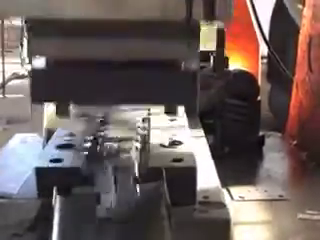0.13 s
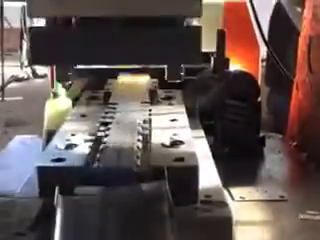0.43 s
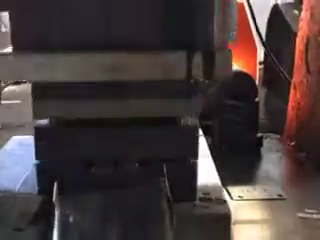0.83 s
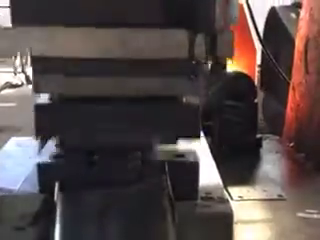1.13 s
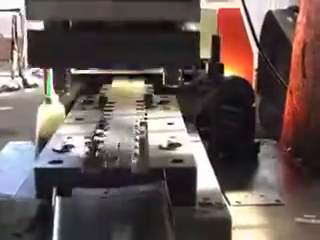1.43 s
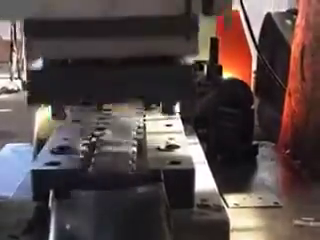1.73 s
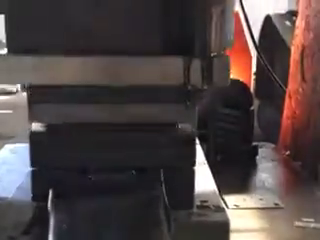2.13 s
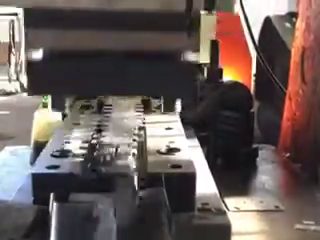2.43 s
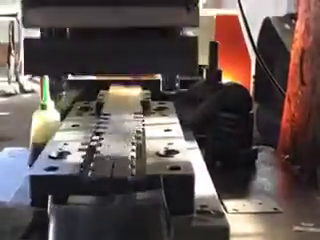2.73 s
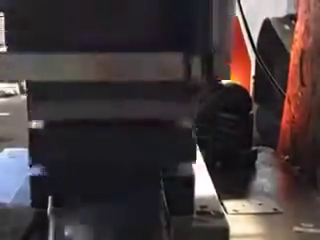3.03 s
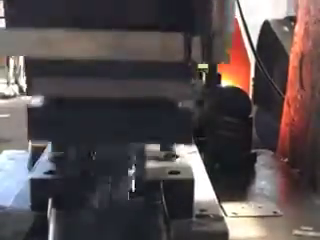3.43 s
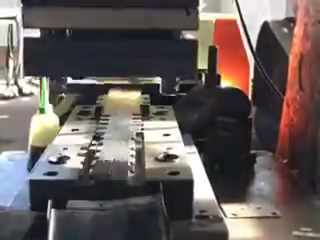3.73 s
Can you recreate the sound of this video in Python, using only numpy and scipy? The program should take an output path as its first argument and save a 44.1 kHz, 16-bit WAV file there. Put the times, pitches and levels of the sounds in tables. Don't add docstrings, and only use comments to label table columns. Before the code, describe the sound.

Stamping press pounds about once a second, steel clanks ringing over a roaring factory hall

```python
import sys
import numpy as np
from scipy import signal
from scipy.fft import rfft, irfft, next_fast_len
from scipy.io import wavfile
from scipy.ndimage import uniform_filter1d

SR = 44100
rng = np.random.default_rng(int(sys.argv[2]) if len(sys.argv) > 2 else 0)


def to_linear_factor(level_db):
    exponent = np.asarray(level_db, float) / 20
    return 10 ** exponent


def dump(signal):
    limited = np.clip(np.atleast_2d(signal).T, -1, 1)
    pcm = np.round(limited * 32767).astype(np.int16)
    wavfile.write(sys.argv[1], SR, pcm)


N = 171990

# start in seconds, peak in dB, pitch in Hz, 60 dB decay in seconds.
CLANKS = [(0.001, -1, 485, 0.62), (0.1, -10.5, 1300, 0.28), (0.442, -13.5, 485, 0.1),
          (0.592, -5, 347, 0.19), (0.639, -10.5, 1220, 0.46), (0.866, -7, 1190, 0.33),
          (0.881, -5.5, 1350, 0.16), (0.94, -4, 434, 0.62), (1.009, -15, 1080, 0.8), (1.1, -11.5, 670, 1),
          (1.207, -16, 600, 0.39), (1.271, -1.5, 622, 0.091), (1.585, -9.5, 780, 0.42),
          (1.719, -6, 347, 0.18), (1.78, -10, 1260, 1), (2, -6, 730, 0.16), (2.058, -6, 356, 0.49),
          (2.139, -8, 1060, 0.58), (2.248, -12.5, 371, 1), (2.329, -5, 483, 0.24), (2.39, -11.5, 371, 0.22),
          (2.745, -9.5, 1190, 0.39), (2.849, -8.5, 600, 0.4), (2.911, -1, 955, 0.28),
          (3.185, -6, 540, 0.48), (3.259, -10.5, 1060, 0.46), (3.398, -9, 605, 0.81),
          (3.469, -2, 458, 0.19)]
# start in seconds, peak in dB, pitch in Hz, 60 dB decay in seconds.
NEIGHBOUR = [
    (0.038, -12, 1060, 0.39),
    (0.328, -14.5, 623, 0.65),
    (0.379, -10.5, 351, 0.21),
    (0.773, -15, 716, 1),
    (1.365, -8, 1160, 0.13),
    (1.919, -13.5, 1200, 0.31),
    (2.982, -4.5, 693, 0.15),
    (3.115, -11.5, 422, 0.79),
    (3.329, -10, 517, 0.47),
    (3.854, -9.5, 810, 0.91),
]


def rms_one(x):
    return x / np.sqrt(np.mean(x ** 2) + 1e-20)


def lowpass(x, hz):
    return signal.sosfilt(signal.butter(2, hz, fs=SR, output="sos"), x)


def shape_spectrum(x, curve):
    hz, db = np.transpose(curve)
    f = np.maximum(np.arange(N // 2 + 1) * SR / N, 1)
    return irfft(rfft(x) * to_linear_factor(np.interp(np.log(f), np.log(hz), db)), N)


def coloured(spectrum):
    return rms_one(shape_spectrum(rng.standard_normal(N), spectrum))


def resonate(x, hz, width_hz):
    r = np.exp(-np.pi * width_hz / SR)
    poles = [1, -2 * r * np.cos(2 * np.pi * hz / SR), r * r]
    return signal.lfilter(np.array([1, 0, -1]) * (1 - r * r) / 2, poles, x + 1e-18)


def drift(rate_hz):
    r = np.exp(-2 * np.pi * rate_hz / SR)
    slow = signal.lfilter([1], [1, -2 * r, r * r], rng.standard_normal(N + SR))[SR:]
    return rms_one(slow - slow.mean())


def blows(table, attack_s, q, broad_db, cut_hz, gain_db):
    # frequency in Hz, density in dB per Hz.
    steel_colour = [(60, -26), (248, -10), (300, -9), (1130, -10), (2210, -17.5), (3820, -21.5),
                    (6730, -28), (7900, -32.5)]
    out = np.zeros(N + SR)
    t = np.arange(SR // 2) / SR
    rattle = to_linear_factor(2.5 * drift(57))
    steel = lowpass(coloured(steel_colour), cut_hz) * rattle
    steel = np.concatenate([steel, steel[:SR]])
    white = rng.standard_normal(N + SR)
    for start_s, db, hz, t60 in table:
        i = max(int(start_s * SR), 0)
        span = slice(i, i + len(t))
        shape = (1 - np.exp(-t / attack_s)) * to_linear_factor(db + gain_db - 60 * t / max(t60, .02))
        tone = rms_one(resonate(resonate(white[span], hz, hz / q), hz, 2 * hz / q))
        out[span] += shape * (tone + to_linear_factor(broad_db) * steel[span])
    return out[:N]


def drone():
    # frequency in Hz, density in dB per Hz.
    roar_colour = [(60, -27), (217, -1), (289, -7.5), (710, -8.5), (2430, -16), (3520, -18.5),
                   (6660, -30.5), (7900, -39)]
    # frequency in Hz, width in Hz, level in dB.
    motor_whines = [(247, 40, -39), (600, 50, -39), (700, 16, -33), (1268, 25, -37), (3530, 150, -43)]
    whines = np.zeros(N)
    for hz, width_hz, db in motor_whines:
        whine = rms_one(resonate(rng.standard_normal(N), hz, width_hz))
        whines += to_linear_factor(db + 1.4 * drift(2.4)) * whine
    flicker = to_linear_factor(-23 + 2.2 * drift(10))
    return flicker * coloured(roar_colour) + whines


def clanks():
    return blows(CLANKS, attack_s=.009, q=4.1, broad_db=5.5, cut_hz=3180, gain_db=-10.0)


def frame():
    # frequency in Hz, level in dB, 60 dB decay in seconds.
    frame_modes = [(240.5, -10, 0.38), (380.7, -1.5, 0.14), (600, -7.5, 0.13), (692, -12.5, 0.48),
                   (1237, 3, 0.089), (1674, -4, 0.11)]
    start_s, db = np.transpose(list(CLANKS) + list(NEIGHBOUR))[:2]
    out = np.zeros(N)
    luck_db = rng.normal(0, 3.9, (len(start_s), len(frame_modes)))
    for k, (hz, mode_db, t60) in enumerate(frame_modes):
        clicks = np.zeros(N)
        clicks[(start_s * SR).astype(int)] = to_linear_factor(db + mode_db - 13 + luck_db[:, k])
        r = to_linear_factor(-60 / (t60 * SR))
        w = 2 * np.pi * hz / SR
        out += signal.lfilter([0, np.sin(w)], [1, -2 * r * np.cos(w), r * r], clicks + 1e-18)
    return out


def thumps():
    # start in seconds, peak in dB, pitch in Hz, 60 dB decay in seconds.
    low_thumps = [(.004, 3, 217, 0.15), (.059, -15, 222, 0.28), (.345, -7.5, 178, 0.56),
                  (.594, -16, 237, 0.17), (.982, 6, 234, 0.16), (1.159, -1.5, 253, 0.36),
                  (1.912, -7.5, 177, 0.43), (2.03, -15.5, 246, 0.27), (2.14, -1, 250, 0.27),
                  (2.249, -8, 207, 0.9), (2.364, -17.5, 230, 0.41), (2.89, -3.5, 172, 0.58),
                  (2.937, 2, 210, 0.13), (3.019, -6, 229, 0.13), (3.129, -13, 226, 0.11),
                  (3.262, -3, 236, 0.34), (3.402, -7.5, 238, 0.43), (3.854, -6.5, 177, 0.35)]
    return blows(low_thumps, attack_s=0.008, q=1.95, broad_db=-14.5, cut_hz=1600, gain_db=-9.5)


def hall(x):
    t60_s, cut_hz = 0.73, 8400
    size = next_fast_len(N + 2 * SR)
    f = np.arange(size // 2 + 1) * SR / size
    response = 0
    for k, lag_s in enumerate(rng.uniform(.02, .06, 12)):
        loss = to_linear_factor(-60 * lag_s / t60_s * (1 + (f / cut_hz) ** 2))
        loop = loss * np.exp(-2j * np.pi * f * lag_s)
        response = response + (-1) ** k * loop / (1 - loop)
    return irfft(rfft(x, size) * response, size)[:N] / 1.84


def ticks():
    # start in seconds, peak in dB, pitch in Hz, 60 dB decay in seconds.
    punch_ticks = [(0.0344, -6.5, 3650, 0.1), (0.0762, -6.5, 2780, 0.2), (0.2924, -11, 2320, 0.35),
                   (0.6438, -16, 2240, 0.2), (0.8555, -15.5, 2310, 0.2), (0.9308, -20, 3420, 0.29),
                   (1.0055, -6, 3380, 0.094), (1.058, -21, 3330, 0.17), (1.207, -6.5, 2790, 0.12),
                   (1.24, -19.5, 3030, 0.13), (1.2675, -13.5, 2680, 0.18), (1.599, -17.5, 2970, 0.23),
                   (1.7704, -14, 2300, 0.42), (1.917, -20, 2010, 0.92), (2.0906, -21, 2235, 0.31),
                   (2.1365, -5, 2850, 0.074), (2.109, -19, 2600, 0.12), (2.286, -17, 2200, .12),
                   (2.2468, -7.5, 2810, 0.097), (2.334, -6.5, 2060, 0.14), (2.388, -11.5, 2090, 0.1),
                   (2.5694, -16, 2245, 0.23), (2.8994, -11.5, 2120, 0.25), (3.1905, -15.5, 2100, 0.26),
                   (3.3767, -7.5, 2560, 0.059), (3.267, -12, 3000, 0.066), (3.4137, -12, 2800, 0.1),
                   (3.465, -7, 2910, 0.12), (3.7013, -12, 3040, 0.25), (3.8488, -16.5, 3470, 0.39)]
    die_modes = [1900, 2250, 2850, 3320, 3700, 4990]
    width_hz = 150
    raw = blows(punch_ticks, attack_s=0.00074, q=1.42, broad_db=-12.0, cut_hz=4700, gain_db=-10.5)
    rung = np.zeros(N)
    for hz in die_modes:
        rung += to_linear_factor(7.1 * drift(2.6)) * resonate(resonate(raw, hz, width_hz), hz, 3 * width_hz)
    return raw + to_linear_factor(-6.5) * rms_one(rung) * np.std(raw)


def pings():
    # start in seconds, peak in dB, pitch in Hz, 60 dB decay in
    # seconds.
    ringing_steel = [(1.207, -24, 5000, .07), (1.24, -25, 5000, .12), (1.24, -22, 3700, .08),
                     (2.247, -20, 5000, .07), (2.247, -19, 2850, .08), (3.432, -21, 5000, .07),
                     (3.432, -19, 2850, .08), (3.498, -21, 6050, .08), (.78, -23, 2850, .1),
                     (1.225, -21, 2850, .2), (1.587, -14, 805, .22), (2.98, -10, 703, .25),
                     (.593, -10, 347, .12), (1.03, -12, 246, .3), (2.145, -8, 248, .3), (.105, -22, 4950, .1),
                     (.037, -24, 4980, .07), (.958, -25, 5820, .08), (1.109, -30, 5150, .12),
                     (1.168, -31, 5000, .1), (1.27, -21, 3750, .07), (1.27, -21, 2750, .1),
                     (2.298, -25, 4990, .08), (2.336, -25, 4990, .1), (2.336, -26, 6250, .06),
                     (2.39, -28, 6050, .08), (2.11, -18, 1910, .15), (2.382, -17, 1720, .12),
                     (2.395, -19, 2050, .1), (.882, -13, 1550, .1), (3.463, -18, 2900, .07),
                     (3.377, -20, 2570, .08), (3.5, -25, 2750, .15), (3.272, -9, 246, .35),
                     (1.725, -13, 350, .12), (2.06, -11, 369, .12), (3.27, -15, 1120, .15),
                     (.65, -17, 1700, .12), (3.48, -15, 1267, .2)]
    out = np.zeros(N + SR)
    t = np.arange(SR // 2) / SR
    for start_s, db, hz, t60 in ringing_steel:
        w = 2 * np.pi * hz
        ring = np.sin(w * t) + .4 * np.sin(w * 1.02 * t + 2) + .3 * np.sin(w * .985 * t)
        i = int(start_s * SR)
        out[i:i + len(t)] += to_linear_factor(2.5 + db - 60 * t / t60) * (1 - np.exp(-t / .004)) * ring
    return out[:N]


def neighbour():
    return blows(NEIGHBOUR, attack_s=0.0023, q=5.2, broad_db=4.5, cut_hz=1880, gain_db=-12)


def chips():
    # start in seconds, peak in dB, pitch in Hz, 60 dB decay in seconds.
    scrap = [(.105, -18, 5100, .25), (.312, -19.5, 4660, 0.24), (.703, -26, 5000, 0.085),
             (.958, -23, 5900, 0.13), (1.018, -14, 6200, 0.21), (1.109, -26, 5200, 0.4),
             (1.222, -21, 6000, 0.08), (1.378, -25, 6050, 0.24), (1.78, -23.5, 5860, 0.82),
             (2.088, -16.5, 5900, 0.14), (2.149, -12.5, 6400, 0.25), (2.298, -14.5, 5000, 0.1),
             (2.336, -19.5, 6200, 0.11), (2.371, -29.5, 4560, 0.13), (2.39, -17.5, 6230, 0.12),
             (1.918, -25.5, 5400, .5), (2.912, -12.5, 5350, 0.12), (2.981, -23.5, 4300, 0.26),
             (3.27, -21, 6800, 0.36), (3.465, -19, 5900, 0.29), (3.56, -25.5, 6800, 0.16)]
    return blows(scrap, attack_s=0.0018, q=3.8, broad_db=-18, cut_hz=8000, gain_db=-10)


def jet():
    # time in seconds, level in dB, whistle pitch in Hz.
    jet_course = [
        (3.187, -48.5, 5950),
        (3.204, -29, 5874),
        (3.262, -24.5, 5600),
        (3.275, -31.5, 5405),
        (3.359, -27.5, 4930),
        (3.408, -33, 4650),
        (3.46, -29.5, 4150),
        (3.531, -30.5, 3890),
        (3.7, -38.5, 3810),
    ]
    start_s, db, hz = np.transpose(jet_course)
    t = np.arange(N) / SR
    wide = np.clip((t - 3.265) / 0.026, 0, 1)
    narrow_wobble = np.sqrt(1 - wide) * rms_one(lowpass(rng.standard_normal((2, N)), 150))
    wide_wobble = np.sqrt(wide) * rms_one(lowpass(rng.standard_normal((2, N)), 240))
    wobble = narrow_wobble + wide_wobble
    phase = 2 * np.pi * np.cumsum(np.interp(t, start_s, hz)) / SR
    whistle = wobble[0] * np.cos(phase) + wobble[1] * np.sin(phase)

    white = rng.standard_normal(N)
    hiss = signal.sosfilt(signal.butter(2, [3800, 7200], "band", fs=SR, output="sos"), white)

    nozzle_hz, width_hz, from_s, to_s = 5750, 350, 3.27, 3.43
    nozzle = rms_one(resonate(resonate(white[::-1], nozzle_hz, width_hz), nozzle_hz, 2 * width_hz))
    nozzle = nozzle * np.clip(np.minimum(t - from_s, to_s - t) / 0.027, 0, 1)

    gate = to_linear_factor(np.interp(t, start_s, db, left=-120, right=-120))
    return gate * (whistle + to_linear_factor(-7) * rms_one(hiss) + to_linear_factor(-3.5) * nozzle)


def scene():
    struck = thumps() + clanks() + neighbour() + ticks() + frame() + chips()
    near = struck + jet()
    return (near + to_linear_factor(-10) * hall(near) + pings() + drone())[None]


def band_limit(x):
    return signal.sosfilt(signal.butter(12, 7900, fs=SR, output="sos"), x)


def record(dry):
    # frequency in Hz, gain in dB.
    mic_colour = [(1900, -0.5), (2450, -2), (3000, 0.04), (4100, 2), (4450, -0.5), (7000, 1), (7480, 5.5),
                  (7620, -20)]
    limit_db, release_db_per_s, clip = -12, 209, 1
    dry = signal.sosfilt(signal.butter(4, 117, "high", fs=SR, output="sos"), dry)
    level = 10 * np.log10(uniform_filter1d(dry ** 2, size=220, axis=-1) + 1e-12)
    fall = release_db_per_s * np.arange(N) / SR
    held = np.maximum.accumulate(level + fall, axis=-1) - fall
    excess_db = uniform_filter1d(np.maximum(held - limit_db, 0), size=200, axis=-1)
    limited = dry * to_linear_factor(-.6 * excess_db)
    rounded = clip * np.tanh(limited / clip)
    narrow = signal.sosfilt(signal.cheby2(16, 65, 7800, fs=SR, output="sos"), rounded)
    return band_limit(shape_spectrum(narrow, mic_colour))


dry = scene()
out = record(dry)
dump(out)
```